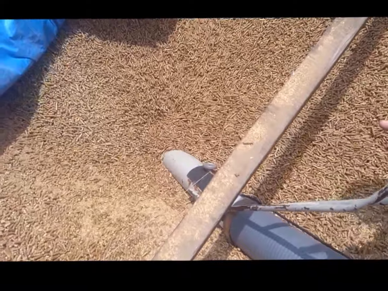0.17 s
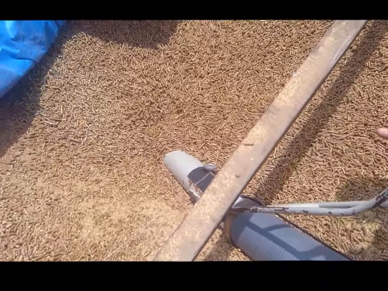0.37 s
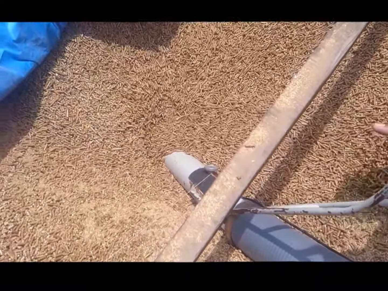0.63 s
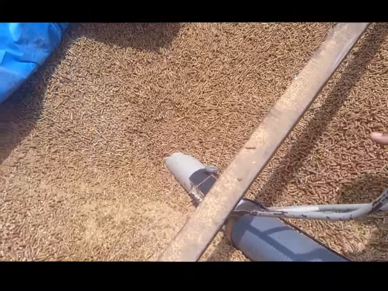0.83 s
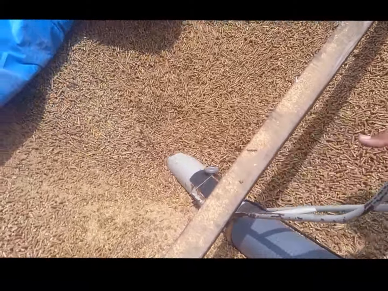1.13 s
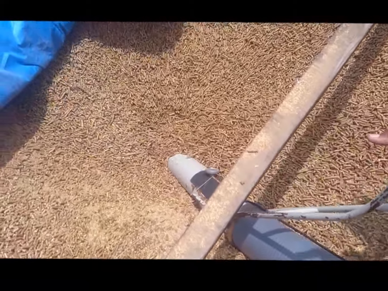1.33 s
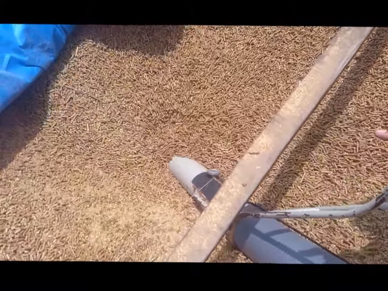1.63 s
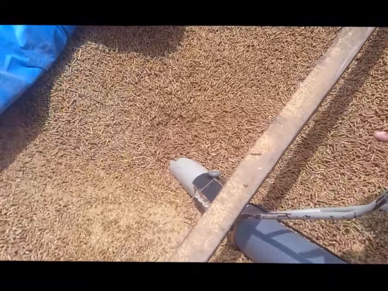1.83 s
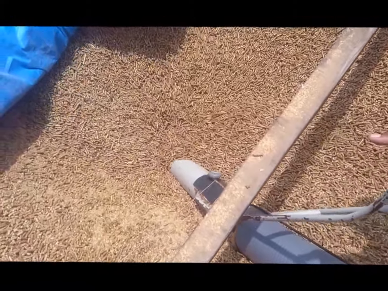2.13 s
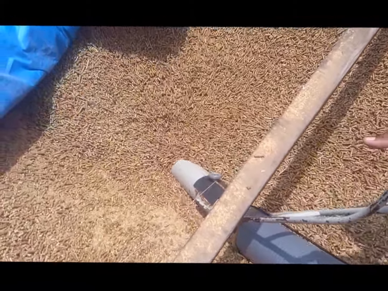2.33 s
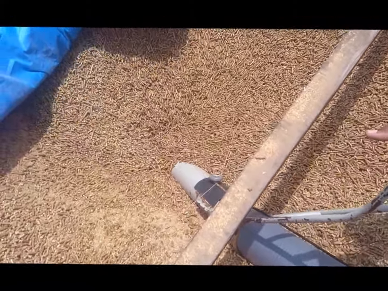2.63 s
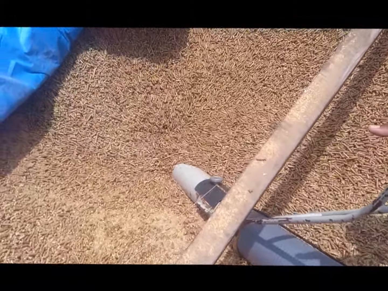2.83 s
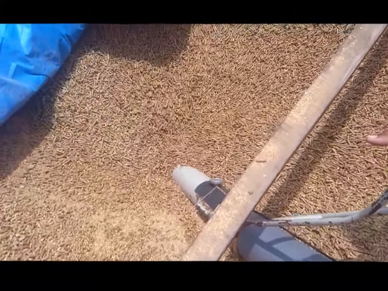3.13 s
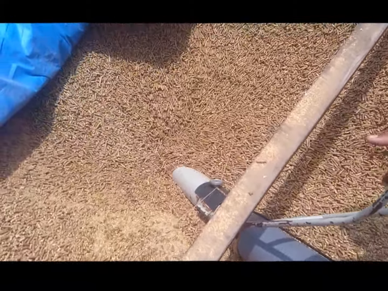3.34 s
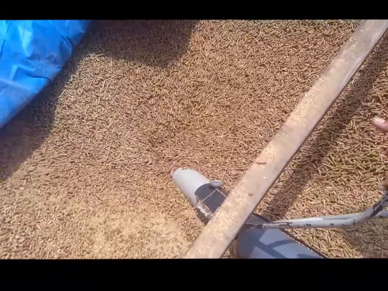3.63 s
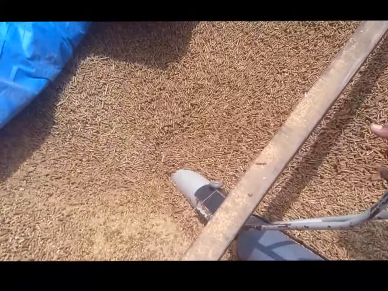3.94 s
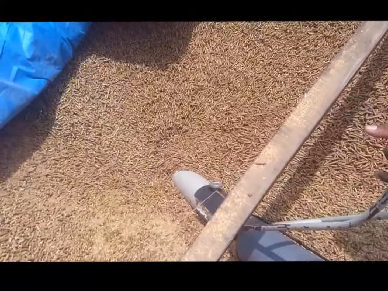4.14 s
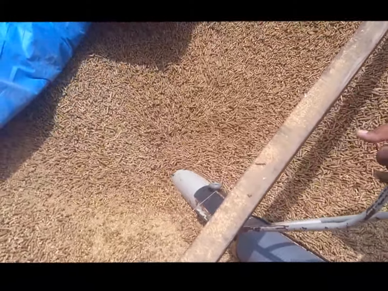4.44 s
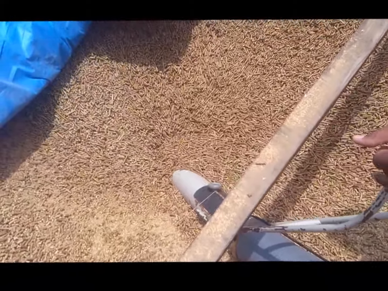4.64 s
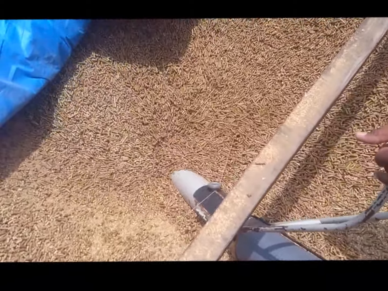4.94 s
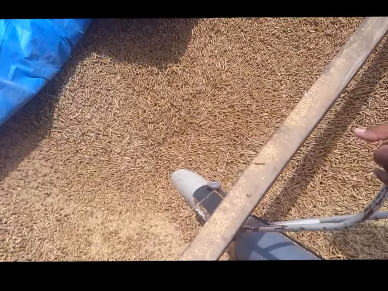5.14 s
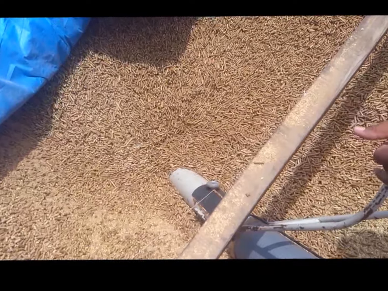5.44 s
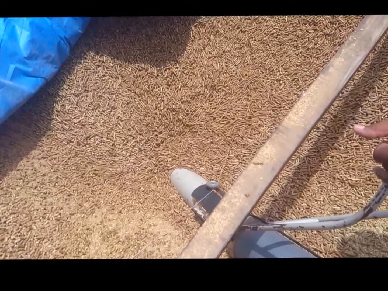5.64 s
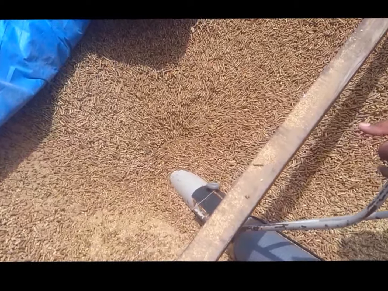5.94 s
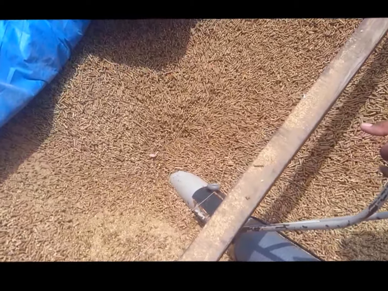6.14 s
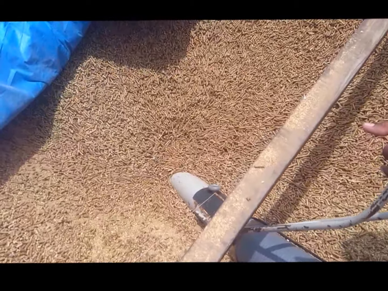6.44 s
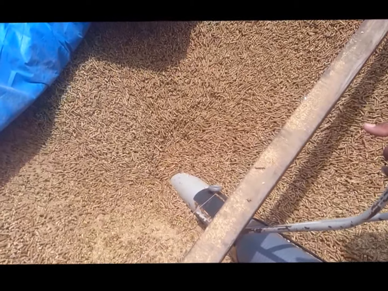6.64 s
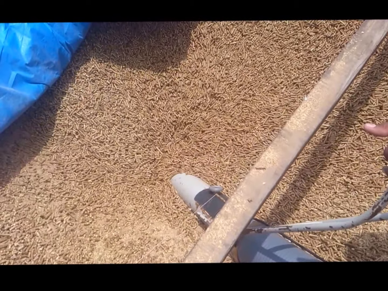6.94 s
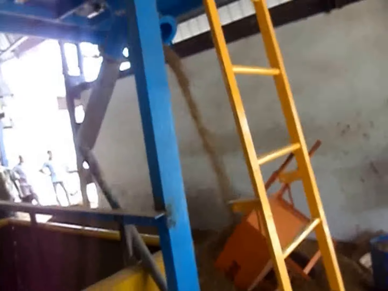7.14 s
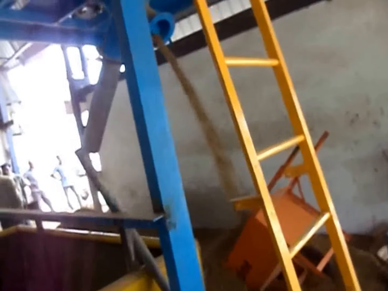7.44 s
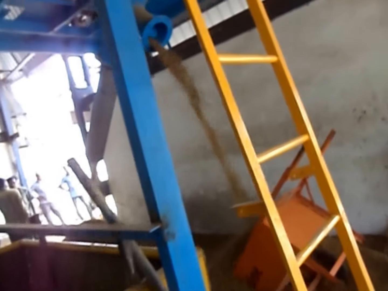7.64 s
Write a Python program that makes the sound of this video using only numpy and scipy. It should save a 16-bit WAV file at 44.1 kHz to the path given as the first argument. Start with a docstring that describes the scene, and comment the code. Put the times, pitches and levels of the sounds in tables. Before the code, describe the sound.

From the start, a suction conveyor's blower runs close by with a loud, steady low hum, a faint whine and a roar of air entering the hose. Grain rattles densely inside the steel nozzle, and a bright fizzing hiss of sliding kernels swells and eases slightly with the flow. A faint hollow note from the hose mouth slowly grows underneath. Hard kernels strike the metal with short, sharp ticks: three between 1.3 and 1.6 seconds, two just before 4, one at 4.7 and two around 6.8. At about 7.1 seconds everything stops dead. After a brief silence, the same machine fades in by 7.5 seconds, far quieter and duller, as if across a hall, its low hum and muffled roar swelling slightly until the end at about 8 seconds.

```python
"""A strong, steady hum: a lobe blower, sounding multiples of its shaft speed, sucks pellets through a hose.
Turbulent air roars in the intake and draws a hollow note from the hose mouth. Pellets rattle in the steel
nozzle, fizz as they slide on each other and now and then strike hard. The sound stops dead; after a short
silence the same machine fades in, farther off and duller. Both channels carry the same signal."""
import sys
import numpy as np
from scipy import signal
from scipy.fft import rfft, irfft, next_fast_len
from scipy.io import wavfile
from scipy.ndimage import uniform_filter1d, map_coordinates

SR = 44100
rng = np.random.default_rng(int(sys.argv[2]) if len(sys.argv) > 2 else 0)


def bounce(signal):
    """Save signal as a 16-bit WAV file at the path given by the first command-line argument."""
    frames = np.transpose(np.atleast_2d(signal))
    limited = np.clip(frames, -1, 1)
    pcm = np.round(limited * 32767).astype(np.int16)
    wavfile.write(sys.argv[1], SR, pcm)


N = 343083
TIME = np.arange(N) / SR
NEAR_END_S = 7.1452


def amp(db):
    return 10 ** (np.asarray(db) / 20)


def unit_rms(x):
    return x / np.sqrt(np.mean(x ** 2) + 1e-20)


def wobble(per_s):
    """A smooth random curve with per_s knots a second."""
    knots = rng.standard_normal(int(N * per_s / SR) + 4)
    return map_coordinates(knots, [TIME * per_s])


def filtered(x, response):
    """x through a complex frequency response."""
    size = next_fast_len(N + SR // 2)
    return irfft(rfft(x, size) * response(np.fft.rfftfreq(size, 1 / SR)), size)[..., :N]


def coloured(x, spectrum):
    """x through an EQ curve of (Hz, dB) points on a log frequency axis, brought to rms 1."""
    points_hz, db = np.transpose(spectrum)
    return unit_rms(filtered(x, lambda hz: amp(np.interp(np.log(hz + 1), np.log(points_hz + 1), db))))


def resonance(hz, centre, width):
    """The band-pass response of one resonance."""
    return 1j * hz * width / (centre ** 2 - hz ** 2 + 1j * hz * width)


def patchy_noise(depth_db):
    """White noise whose level flickers in small patches of time and frequency."""
    spectrogram = signal.stft(rng.standard_normal(N), nperseg=512)[2]
    patches = uniform_filter1d(rng.standard_normal(spectrogram.shape), size=8, axis=0)
    patches = unit_rms(uniform_filter1d(patches, size=10, axis=1))
    return unit_rms(signal.istft(spectrogram * amp(depth_db * patches), nperseg=512)[1][:N])


def impacts(per_s, spread_db):
    """Random pellet clicks of scattered strength."""
    hits = rng.random(N) < per_s / SR
    polarity = rng.choice([-1, 1], size=N)
    return unit_rms(hits * polarity * amp(spread_db * rng.standard_normal(N)))


# The dull tone of the distant roar. Each row: frequency in Hz, relative level in dB.
FAR_ROAR_EQ = [(20, -20), (60, -2), (200, -0.5), (600, -5.5), (1500, -5.5), (3000, -5.5), (4200, -1.5),
               (5000, -5.5), (5400, -13), (5700, -50), (6000, -120)]

def far_machine(fade_end_s=7.49, fade_db_per_s=310, swell_db_per_s=16):
    """The same machine from across the hall, without treble: it fades in, then its roar swells."""
    since_fade = TIME - fade_end_s
    roar_db = -42 + swell_db_per_s * np.maximum(since_fade, 0)
    roar = amp(roar_db) * coloured(patchy_noise(depth_db=.5), FAR_ROAR_EQ)
    fade_in = amp(fade_db_per_s * np.minimum(since_fade, 0))
    return fade_in * (blower(far=True, whine_db=-47, waver_db=-72) + roar)


def hose_mouth(centre_hz=1850, width_hz=160, growth_db_per_s=1.1):
    """Air across the hose mouth sounds one broad, hollow note that slowly grows."""
    note = filtered(patchy_noise(depth_db=1.5), lambda hz: resonance(hz, centre_hz, width_hz) ** 2)
    return amp(-46 + growth_db_per_s * TIME) * unit_rms(note)


# The low roar of the intake air. Each row: frequency in Hz, relative level in dB.
INTAKE_EQ = [(20, -28.5), (40, -7.5), (60, 0.5), (120, 1), (165, -4), (215, -3.5), (245, -1.5), (395, -3),
             (470, -2), (560, -2), (770, -5.5), (860, -3), (930, -6.5), (1150, -12.5), (2200, -38)]

def intake():
    """Turbulent air roars at the mouth of the hose."""
    return amp(-30.5 + .84 * wobble(5)) * coloured(patchy_noise(depth_db=1.28), INTAKE_EQ)


# The ringing modes of the steel nozzle. Each row: frequency in Hz, width in Hz, boost in dB.
NOZZLE_MODES = [(2880, 150, 2.5), (1840, 120, 0.5), (2570, 150, 0.5), (4870, 370, 1)]

def nozzle_ring(hz):
    """The nozzle's response: each mode adds a gentle peak."""
    return 1 + sum((amp(db) - 1) * resonance(hz, centre, width) for centre, width, db in NOZZLE_MODES)


# Hard hits that stand out of the rattle. Each row: start in seconds, peak level in dB.
STRIKES = [(1.265, -9.5), (1.4257, -5.5), (1.5728, -9), (3.8541, -9), (3.9818, -10.5), (4.7027, -12),
           (6.7565, -9), (6.8977, -9.5)]

def pellet_strikes(ring_s=.006):
    """A hard pellet on the steel sets the nozzle's modes ringing for an instant."""
    out, t = np.zeros(N), np.arange(400) / SR
    for start_s, peak_db in STRIKES:
        modes = sum(rng.uniform(.5, 1) * np.sin(2 * np.pi * hz * t) for hz, _, _ in NOZZLE_MODES)
        ping = modes * amp(-60 * t / ring_s)
        out[round(start_s * SR):][:len(t)] += amp(peak_db) * ping / np.abs(ping).max()
    return out


# The thickness of the pellet stream. Each row: time in seconds, flow in dB about its usual level.
PELLET_FLOW = [(0, 1), (.6, 0), (1.1, 1.5), (1.3, 0), (1.8, -.5), (2.4, 1), (2.65, -1.5), (3.1, .5),
               (3.95, 0), (4.9, -.5), (5.45, 1), (5.7, -1.5), (6.2, 0), (7.14, 0)]
# The clatter of pellets in the nozzle. Each row: frequency in Hz, relative level in dB.
RATTLE_EQ = [(590, -35), (1000, -12), (1060, -7.5), (1160, -21), (1290, -9), (1440, -13.5), (1810, -7),
             (2170, -7), (2830, 0), (3240, -6), (3610, -8.5), (4710, -5), (6500, -17), (8450, -40.5),
             (14300, -120)]
# The bright fizz of pellets sliding on pellets. Each row: frequency in Hz, relative level in dB.
FIZZ_EQ = [(3240, -26.5), (5500, -3), (6830, -1.5), (7580, -5), (8450, -1), (9020, -2.5), (10500, -6.5),
           (11700, -14.5), (12900, -15.5), (15500, -34.5)]

def pellet_stream(rattle_db=-22.8, fizz_db=-28):
    """Dense impacts ring the nozzle; each surge of pellets lifts rattle and fizz together."""
    flow_db = np.interp(TIME, *np.transpose(PELLET_FLOW))
    surge_db = .4 * wobble(14)
    knocks = patchy_noise(depth_db=.87) + .4 * impacts(per_s=1000, spread_db=2.5)
    rattle = unit_rms(filtered(coloured(knocks, RATTLE_EQ), nozzle_ring))
    rattle *= amp(rattle_db + .4 * flow_db + surge_db)  # swings less than the fizz
    sliding = patchy_noise(depth_db=1.1) + .45 * impacts(per_s=2500, spread_db=3)
    fizz = amp(fizz_db + flow_db + surge_db) * coloured(sliding, FIZZ_EQ)
    return rattle + fizz


# The partials of the hum, from lowest to highest pitch.
# Each row: multiple of the shaft speed, rms level at the nozzle in dB, rms level from afar in dB.
SHAFT_ORDERS = [(2, -10, -32.5), (3, -46.5, -63), (4, -42, -58), (6, -32, -60), (7, -46.5, -62),
                (8, -26.5, -64), (9, -53, -69), (10, -42.5, -55), (12, -44.5, -56), (13, -49.5, -65),
                (14, -38.5, -57), (15, -50, -68)]

def blower(far, whine_db, waver_db, shaft_hz=45.09, whine_hz=497.2):
    """The lobes hum in partials locked to one steady shaft speed; a faint whine drifts on its own."""
    t = TIME - NEAR_END_S  # the near sound ends as the main partial crosses zero
    shaft_angle = 2 * np.pi * shaft_hz * t + .01 * wobble(.4)
    partials = [(order, far_db if far else near_db) for order, near_db, far_db in SHAFT_ORDERS]
    main_order, main_db = partials[0]
    hum = amp(main_db) * np.sin(main_order * shaft_angle)
    for order, db in partials[1:]:
        level = amp(db) + amp(waver_db) * wobble(4)  # the weak partials waver most
        hum += level * np.sin(order * shaft_angle + rng.uniform(0, 2 * np.pi))
    whine = np.sin(2 * np.pi * whine_hz * t + .65 * wobble(2))
    whine *= amp(whine_db + 1.2 * wobble(4))
    return np.sqrt(2) * (hum + whine)


def scene():
    """The scene changes within a millisecond: the near sound breaks off, then the far machine fades in."""
    hum = blower(far=False, whine_db=-36, waver_db=-57)
    near = hum + intake() + pellet_stream() + pellet_strikes() + hose_mouth()
    gate = np.clip((NEAR_END_S - TIME) / .0008, 0, 1)
    return np.tile(near * gate + far_machine(), (2, 1))


def record(dry):
    """A steep low-pass takes off the very top of the treble."""
    top_hz, slope_width_hz = 15720, 120
    return filtered(dry, lambda hz: np.clip((top_hz - hz) / slope_width_hz, 0, 1))


dry = scene()
out = record(dry)
bounce(out)
```